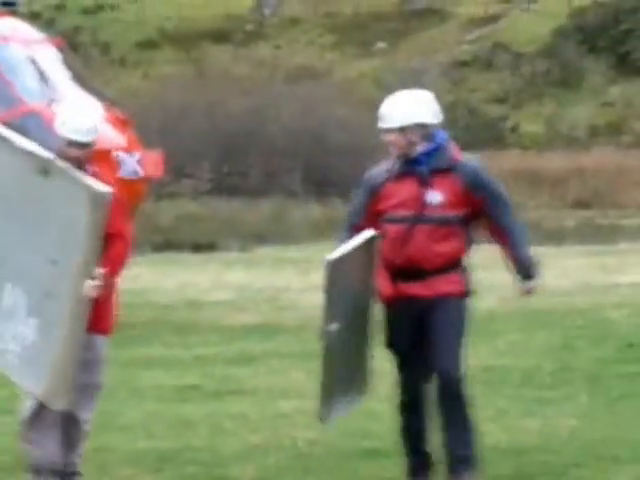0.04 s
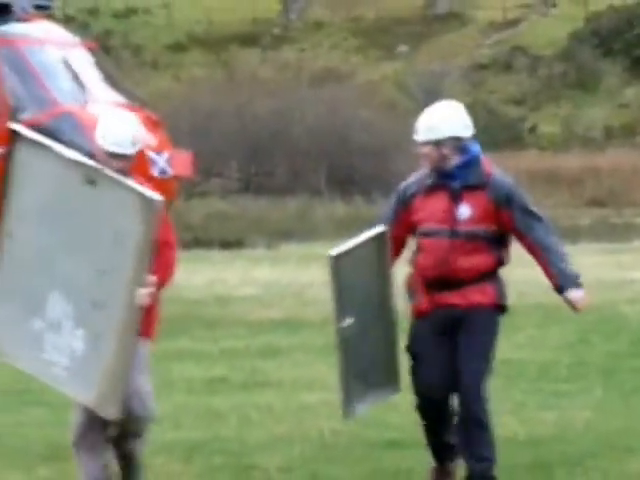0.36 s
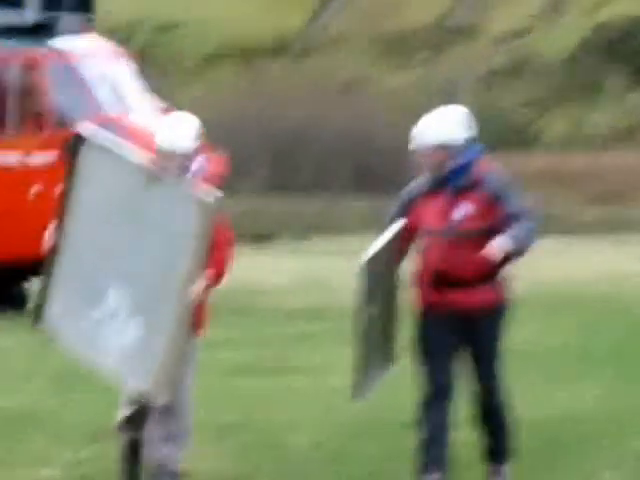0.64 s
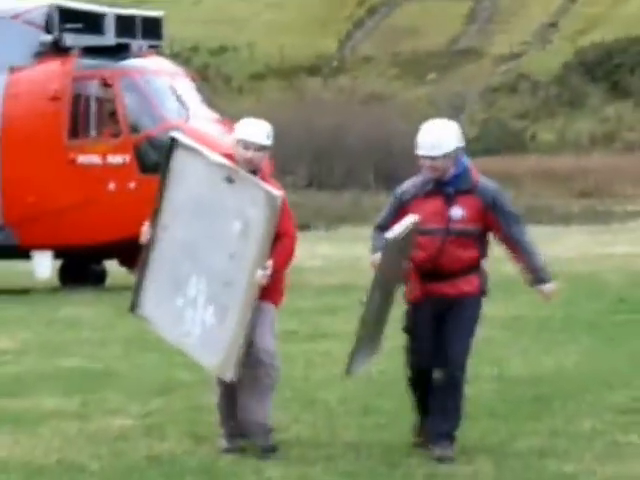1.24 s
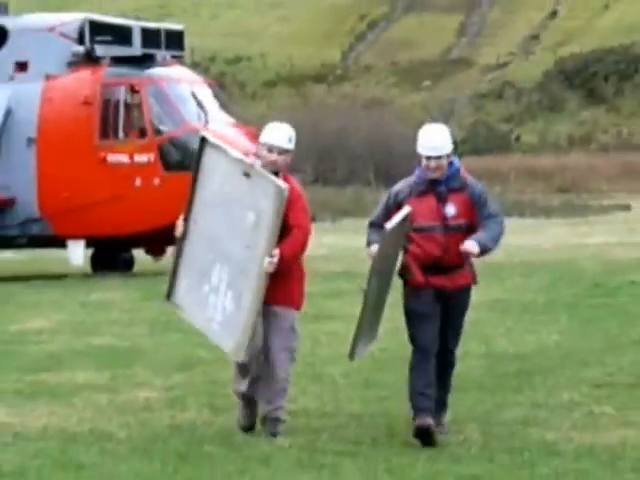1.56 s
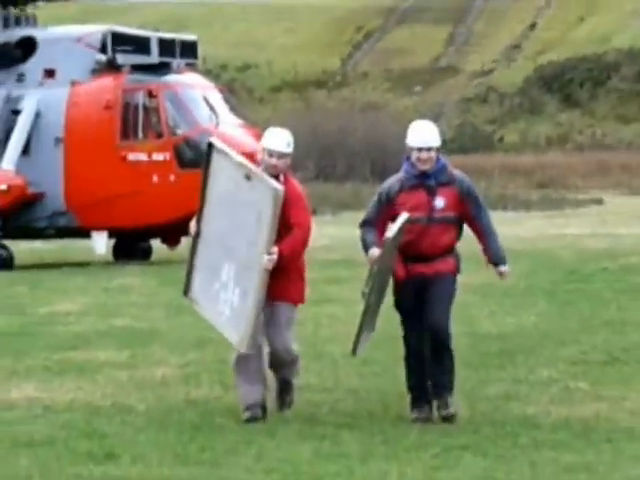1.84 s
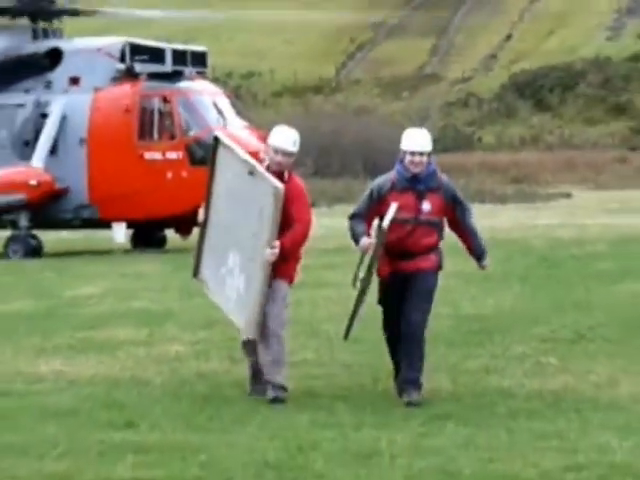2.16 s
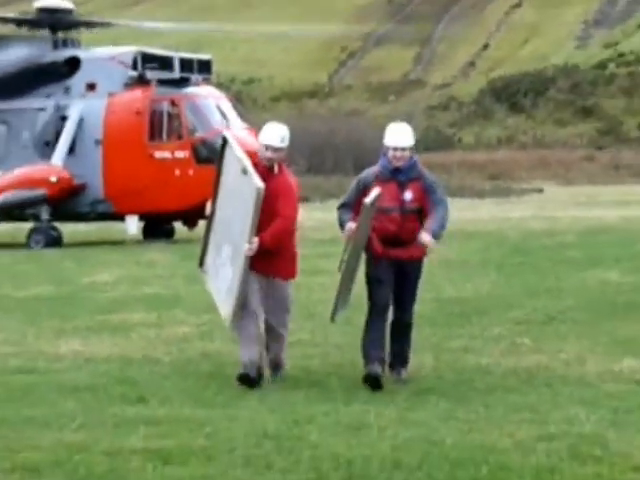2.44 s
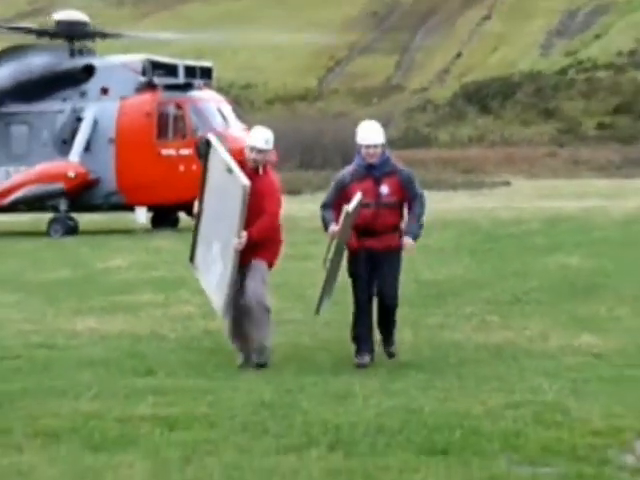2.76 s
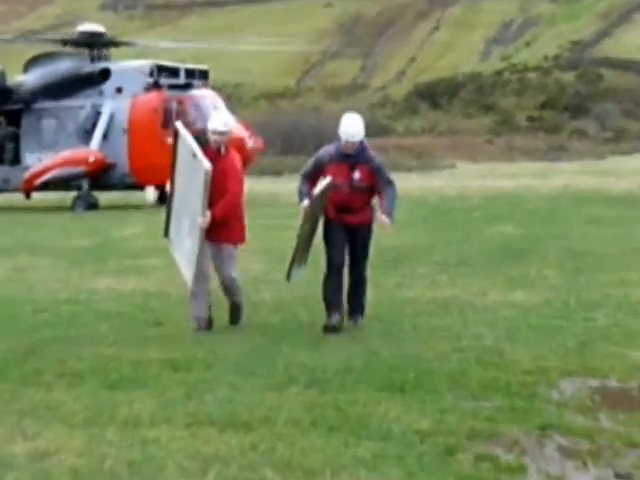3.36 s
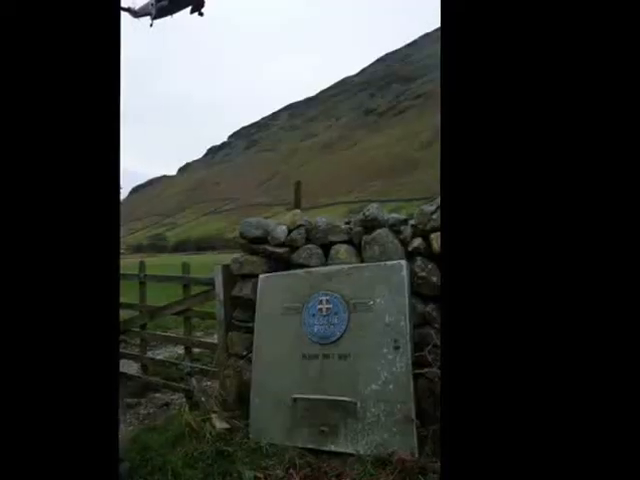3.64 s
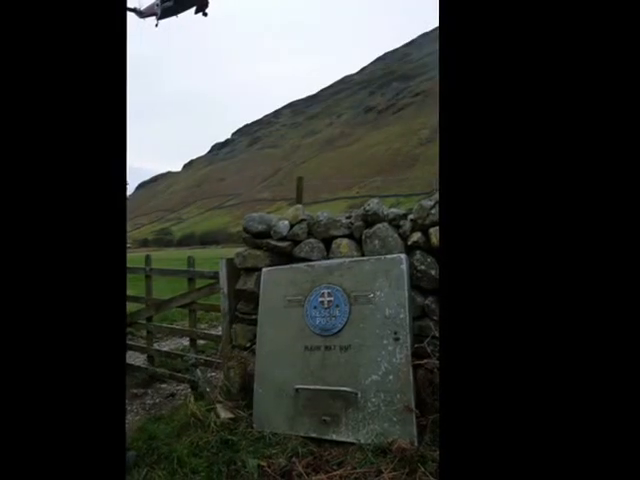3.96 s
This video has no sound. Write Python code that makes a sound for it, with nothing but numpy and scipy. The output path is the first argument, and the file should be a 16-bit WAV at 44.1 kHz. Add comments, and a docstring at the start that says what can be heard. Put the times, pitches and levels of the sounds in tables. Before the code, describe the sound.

A helicopter runs some way off on open grass, its low roar and rushing blade swish fluttering rapidly. A droning hum, raspy exhaust and faint turbine whine waver in the wind, without echo, until the sound cuts off abruptly.

```python
"""Helicopter standing on open grass

Some way off, five main blades modulate broadband turbulence at their passing frequency: a low roar
and a rushing swish. The tail rotor drones in harmonics; gears and turbines whine faintly.
The rush and the exhaust's rasp swell on the wind, and the sound is cut off shortly before the end."""
import sys
import numpy as np
from scipy import signal
from scipy.fft import rfft, irfft
from scipy.io import wavfile
from scipy.ndimage import uniform_filter1d

SR = 44100
rng = np.random.default_rng(int(sys.argv[2]) if len(sys.argv) > 2 else 0)


def store_pcm(level_fs):
    """Save levels as 16-bit WAV."""
    pcm = np.round(np.clip(level_fs, -1, 1) * 32767).astype(np.int16)
    wavfile.write(sys.argv[1], SR, np.atleast_2d(pcm).T)


N = 176400
T = np.arange(N) / SR
BLADE_HZ, TAIL_HZ = 17.01, 125.0  # blade-passing frequencies of the main and tail rotors
ROAR_LEAD_S, CUT_S = 0.00725, 3.613


def amp(db):
    """Amplitude ratio of a level in decibels."""
    return 10 ** (np.asarray(db) / 20)


def unit_rms(x):
    """Normalisation to unit mean power."""
    return x / np.sqrt(np.mean(x ** 2) + 1e-20)


def swell(contour):
    """Deviation in dB of a level contour from its mean before the cut."""
    db = np.interp(T, *np.transpose(contour))
    return db - db[T < CUT_S].mean()


def drift(rate_hz):
    """Random fluctuation: Gaussian noise of rms 1, low-passed at the given rate."""
    hz = np.fft.rfftfreq(N, 1 / SR)
    return unit_rms(irfft(rfft(rng.standard_normal(N)) * (hz > 0) / (1 + (hz / rate_hz) ** 4), N))


def turbulence(spectrum, patch_db):
    """Spectrally shaped noise of rms 1, its level varying in random patches of time and frequency."""
    frames = dict(nperseg=1024, noverlap=768)
    cells = signal.stft(rng.standard_normal(N), **frames)[2]
    patches = uniform_filter1d(rng.standard_normal(cells.shape), size=10, axis=0)
    patches = unit_rms(uniform_filter1d(patches, size=14, axis=1))
    noise = signal.istft(cells * amp(patch_db * patches), **frames)[1][:N]
    hz = np.fft.rfftfreq(N, 1 / SR)
    points_hz, points_db = np.transpose(spectrum)
    colour = amp(np.interp(np.log(hz + 1), np.log(points_hz + 1), points_db))
    rolloff = np.maximum(hz / points_hz[-1], 1) ** 2  # 12 dB per octave above the last point
    return unit_rms(irfft(rfft(noise) * colour / rolloff, N))


def tone(hz, db, wander_hz, fade_db):
    """A sinusoid modulated at random in frequency and amplitude by the moving air."""
    cycles = np.cumsum(hz + wander_hz * drift(5.6)) / SR + rng.random()
    return amp(db) * unit_rms(np.sin(2 * np.pi * cycles) * amp(fade_db * drift(11)))


def resonance(hz, half_width_hz):
    """Narrow-band noise of rms 1: random quadrature components on a fixed or gliding carrier."""
    phase = 2 * np.pi * np.cumsum(hz * np.ones(N)) / SR
    return unit_rms(drift(half_width_hz) * np.cos(phase) + drift(half_width_hz) * np.sin(phase))


def blade_beat(lead_s=0):
    """Periodic modulation by the main blades; a second harmonic sharpens each peak."""
    first_blade_s = 0.011
    phase = 2 * np.pi * BLADE_HZ * (T - first_blade_s + lead_s)
    return np.cos(phase) + 0.42 * np.cos(2 * phase)


# Spectrum of the buffeting: f/Hz, relative level/dB
RUMBLE_SPECTRUM = [(20, -14.5), (45, -7.5), (75, 3.5), (110, -1), (160, -22)]

def rumble():
    """Low-frequency buffeting of the air swells and fades once under a Gaussian envelope."""
    peak_s, half_width_s = 2.1, 0.5
    envelope = np.exp(-((T - peak_s) / half_width_s) ** 2)
    return amp(-46) * envelope * turbulence(RUMBLE_SPECTRUM, patch_db=2.0)


# Spectrum of the exhaust's hiss: f/Hz, relative level/dB
HISS_SPECTRUM = [(3000, -1.5), (4500, -2.5), (5500, 1.5), (6900, -0.5), (7850, -8.5), (8800, -4.5),
                 (9500, -2.5), (10800, -5), (11900, -9), (13300, -5.5), (14500, -5.5), (15800, -11.5)]
# Envelope of the hiss: t/s, relative level/dB
HISS_CONTOUR = [(0, -55), (.1, -53), (.2, -54), (.36, -52.5), (.46, -53.5), (.53, -52), (.57, -53),
                (.63, -50), (.72, -52.5), (.8, -53), (.95, -54), (1.1, -49.5), (1.16, -52), (1.2, -50),
                (1.29, -48.5), (1.35, -53), (1.44, -52.5), (1.52, -55), (1.62, -50.5), (1.73, -53),
                (1.82, -49.5), (1.99, -55), (2.11, -50.5), (2.2, -54.5), (2.29, -50.5), (2.34, -53.5),
                (2.38, -50.5), (2.43, -53), (2.6, -53), (2.71, -51), (2.81, -51), (2.87, -54.5),
                (2.94, -52.5), (3.05, -53.5), (3.18, -49.5), (3.21, -55), (3.25, -49), (3.3, -56),
                (3.48, -51.5), (3.55, -53), (3.6, -52)]

def hiss():
    """Thin high-frequency exhaust noise, roughened by fast random amplitude modulation."""
    level_db = -53 + swell(HISS_CONTOUR) + 0.7 * blade_beat() + 2.5 * drift(401)
    return amp(level_db) * turbulence(HISS_SPECTRUM, patch_db=0.8)


def exhaust_swell():
    """Common modulation: the exhaust's level in dB follows both the rush and the hiss."""
    return 0.49 * swell(RUSH_CONTOUR) + 0.97 * swell(HISS_CONTOUR)


# Engine resonances: f/Hz, half width/Hz, level/dB
ENGINE_RESONANCES = [(1592, 47, -44.5), (1865, 84, -44)]
# Gearbox and turbine tones: f/Hz, level/dB
ENGINE_TONES = [(1590, -44.5), (2561, -55.5), (5491, -73.5), (6207, -78), (7611, -82), (7989, -83.5),
                (9389, -81.5), (10110, -80.5), (13291, -82.5), (14007, -84.5)]

def whine():
    """Line spectrum of gears and turbines, with noisy resonances that swell with the exhaust."""
    bands = sum(amp(db) * resonance(hz, half_width) for hz, half_width, db in ENGINE_RESONANCES)
    lines = sum(tone(hz, db, wander_hz=3.5, fade_db=2) for hz, db in ENGINE_TONES)
    return amp(exhaust_swell()) * bands + lines


# Envelope of the whoosh: t/s, level/dB
WHOOSH_CONTOUR = [(.88, -60), (.98, -42), (1.11, -34.5), (1.16, -45), (1.22, -37.5), (1.29, -36),
                  (1.35, -47), (1.45, -60)]

def whoosh():
    """A brief, hollow band of exhaust noise whose centre frequency rises linearly."""
    rise_hz_per_s = 1400
    centre_hz = 2650 + rise_hz_per_s * (T - 1.1)
    times, db = np.transpose(WHOOSH_CONTOUR)
    envelope = np.interp(T, times, amp(db), left=0, right=0)
    return envelope * resonance(centre_hz, half_width_hz=300)


# Spectrum of the exhaust's rasp: f/Hz, relative level/dB
RASP_SPECTRUM = [(900, -21), (1350, 0), (1580, 3), (1700, -5), (1880, 1.5), (2060, -6.5), (2170, -2),
                 (2400, -8.5), (3000, -9), (3450, -12.5), (3900, -22), (4600, -28), (7000, -50.5)]
# Spectrum of its half-whistling upper band: f/Hz, relative level/dB
SHRILL_SPECTRUM = [(1900, -29.5), (2400, -2.5), (2570, -0.5), (2780, -2.5), (3000, -1.5), (3250, -7),
                   (3500, -13), (3900, -18), (4600, -32)]
# Envelope of that band: t/s, relative level/dB
SHRILL_CONTOUR = [(0, 0.5), (.5, 0), (.64, 0.5), (.9, 0), (1.1, -1), (1.38, 2), (1.52, -4), (1.83, 1.5),
                  (1.95, -2), (2.1, 4.5), (2.52, -1.5), (2.76, 2), (2.9, -1), (3.07, 2), (3.18, 6.5),
                  (3.33, -1.5), (3.45, 3), (3.6, -2)]

def exhaust():
    """Turbulent turbine exhaust: two noise bands share a flutter and a light blade modulation."""
    chop_db = 0.36 * blade_beat() + 1.06 * drift(140)
    rasp = amp(-33.5 + exhaust_swell() + chop_db) * turbulence(RASP_SPECTRUM, patch_db=1)
    shrill = amp(-41 + swell(SHRILL_CONTOUR) + chop_db) * turbulence(SHRILL_SPECTRUM, patch_db=1.8)
    return rasp + shrill


# Tail rotor partials: harmonic number, level/dB
TAIL_HARMONICS = [(1, -35.5), (2, -35.5), (3, -51)]
# Main rotor partials: harmonic number, level/dB
MAIN_HARMONICS = [(2, -68.5), (3, -57), (5, -49), (6, -49.5)]

def rotor_drone():
    """Rotational noise: each rotor radiates harmonics of its blade-passing frequency."""
    rotors = (TAIL_HZ, TAIL_HARMONICS), (BLADE_HZ, MAIN_HARMONICS)
    return sum(tone(number * hz, db, wander_hz=0.42, fade_db=4.5)
               for hz, harmonics in rotors for number, db in harmonics)


# Gaussian swells of the hum: t/s, half width/s, level/dB
HUM_SURGES = [(0.183, 0.11, -24), (0.397, .035, -27), (0.722, .1, -33), (.92, .06, -27.5),
              (1.13, .035, -30.5), (1.4, 0.025, -27.5), (1.679, 0.1, -31.5), (1.957, 0.022, -21),
              (2.097, 0.027, -25.5), (2.213, 0.05, -26), (2.393, 0.034, -27.5), (2.52, 0.06, -24.5),
              (2.745, 0.022, -22), (2.852, .035, -22.5), (2.961, 0.027, -20.5), (3.057, 0.032, -26),
              (3.275, 0.021, -22.5)]

def rotor_hum():
    """A low rotor tone that comes in swells, amplitude-modulated at the blade-passing frequency."""
    swells = sum(amp(db) * np.exp(-((T - peak_s) / width) ** 2) for peak_s, width, db in HUM_SURGES)
    throb = 1 + 0.12 * blade_beat(ROAR_LEAD_S)
    return (amp(-33) + swells) * throb * tone(hz=188.5, db=0, wander_hz=4, fade_db=0.5)


# Spectrum of the blades' swish: f/Hz, relative level/dB
RUSH_SPECTRUM = [(200, -15), (590, -3), (715, 3.5), (830, -0.5), (1050, 1), (1300, -0.5), (1600, -4.5),
                 (1720, -6), (1900, -6), (2150, -12), (3000, -28.5)]
# Envelope of the swish as the wind carries it: t/s, relative level/dB
RUSH_CONTOUR = [(0.0, -27.5), (0.24, -27.5), (0.39, -26), (0.48, -27.5), (0.59, -24), (0.96, -28),
                (1.02, -25), (1.17, -28), (1.26, -25), (1.41, -27), (1.59, -26.5), (1.62, -23.5),
                (1.74, -26), (1.86, -25.5), (2.01, -28), (2.1, -26), (2.58, -26.5), (2.79, -23.5),
                (2.88, -28.5), (3.09, -26), (3.15, -24.5), (3.33, -30), (3.42, -25), (3.6, -28)]

def rush():
    """Broadband aerodynamic noise that peaks as each main blade passes."""
    level_db = -28 + swell(RUSH_CONTOUR) + 1.77 * blade_beat() + 0.2 * drift(120)
    return amp(level_db) * turbulence(RUSH_SPECTRUM, patch_db=0.7)


# Spectrum of rotor wash and exhaust: f/Hz, relative level/dB
ROAR_SPECTRUM = [(20, -47), (45, -34.5), (75, -28), (105, -16), (148, -2), (180, -3), (212, -2.5),
                 (236, -10), (262, -5), (300, -8.5), (360, -7), (465, -11), (560, -23), (900, -39)]
# Envelope of the roar: t/s, relative level/dB
ROAR_CONTOUR = [(0, -23.5), (.13, -20.5), (.19, -22.5), (.42, -20.5), (.48, -23), (.6, -20), (.79, -20.5),
                (1.0, -22), (1.12, -19), (1.27, -21.5), (1.39, -20), (1.56, -24.5), (1.7, -22), (1.92, -20),
                (2.04, -22), (2.18, -20), (2.26, -24.5), (2.36, -19.5), (2.56, -24.5), (2.66, -22),
                (2.88, -23), (3.12, -20.5), (3.32, -24), (3.44, -26), (3.52, -19.5), (3.6, -21)]

def roar():
    """Low-frequency turbulence of rotor wash and exhaust; its throb leads the swish in phase."""
    level_db = -22 + swell(ROAR_CONTOUR) + 0.5 * blade_beat(ROAR_LEAD_S) + 0.67 * drift(90)
    return amp(level_db) * turbulence(ROAR_SPECTRUM, patch_db=-0.45)


def scene():
    """Free-field superposition: the sources add in one channel, with no echo on open ground."""
    mix = roar() + rotor_hum() + rush() + exhaust() + hiss() + whoosh()
    return (mix + rotor_drone() + whine() + rumble())[None]


def record(dry):
    """Soft saturation rounds the peaks, a 1 ms fade cuts the sound, and a low-pass limits the band."""
    ceiling, edge_hz = amp(-7.6), 15800
    rounded = dry / (1 + (dry / ceiling) ** 6) ** (1 / 6)
    cut = rounded * np.clip((CUT_S - T) / 0.001, 0, 1)
    lowpass = signal.firwin(511, edge_hz, window=("kaiser", 9), fs=SR)
    return signal.oaconvolve(cut, lowpass[None], "same")


dry = scene()
out = record(dry)
store_pcm(out)
```